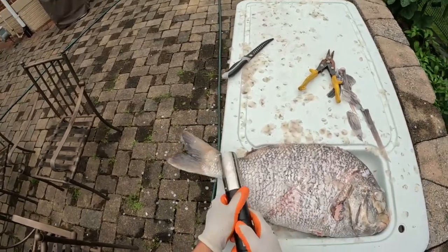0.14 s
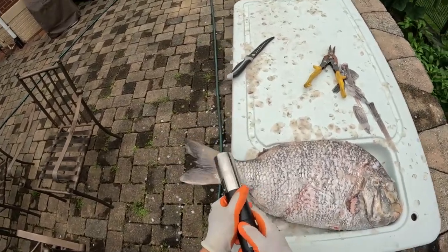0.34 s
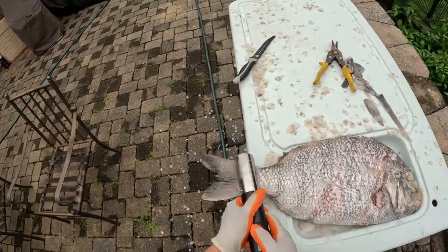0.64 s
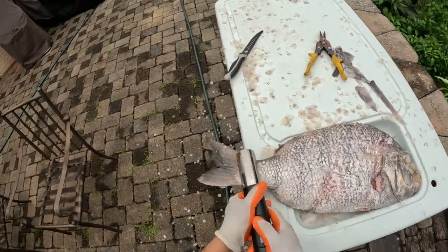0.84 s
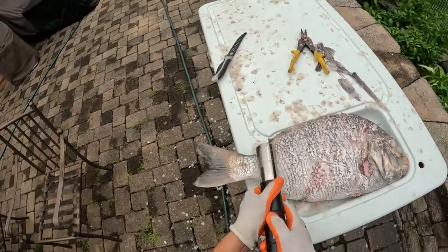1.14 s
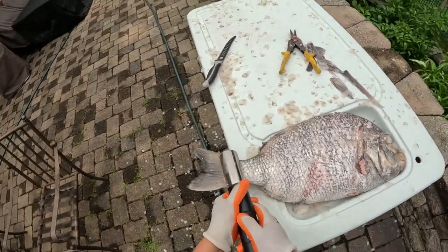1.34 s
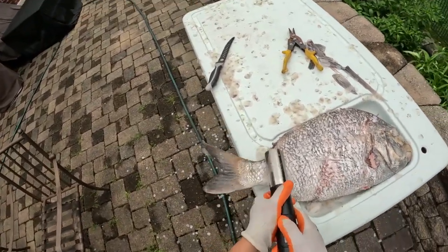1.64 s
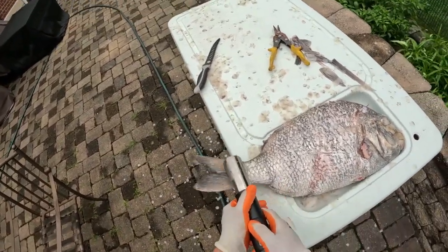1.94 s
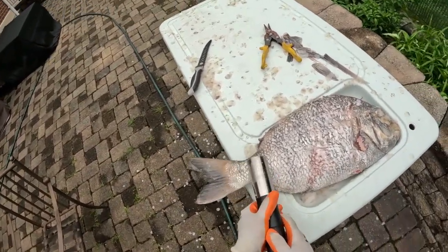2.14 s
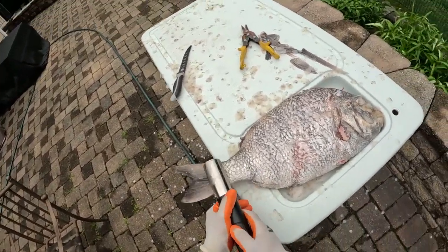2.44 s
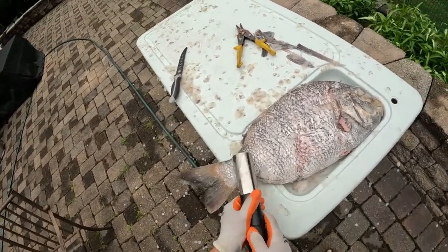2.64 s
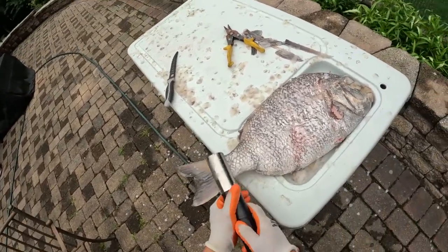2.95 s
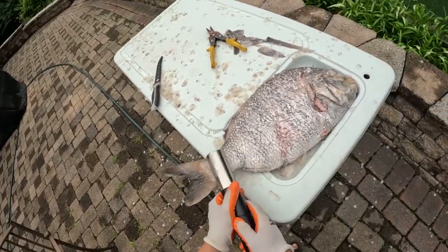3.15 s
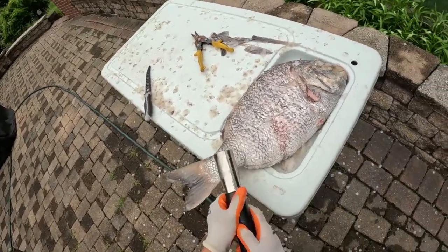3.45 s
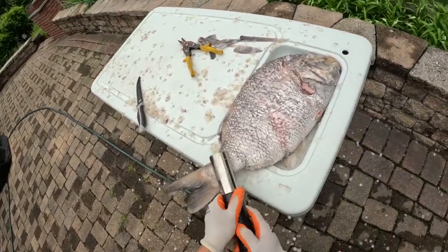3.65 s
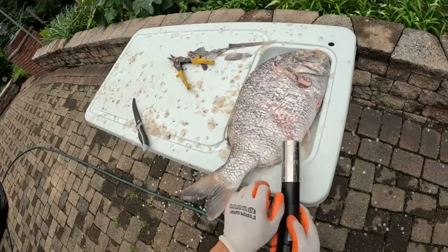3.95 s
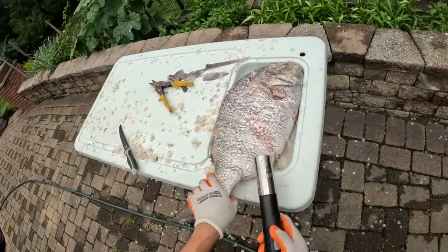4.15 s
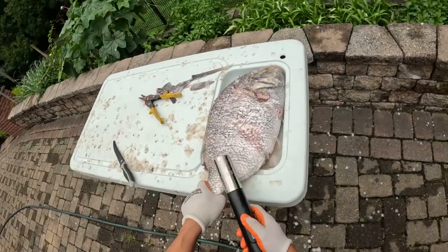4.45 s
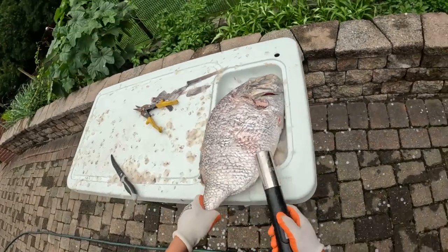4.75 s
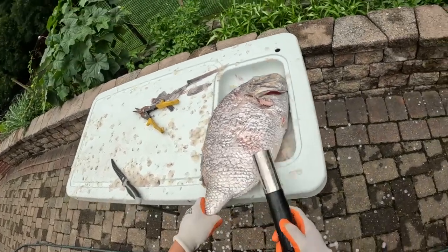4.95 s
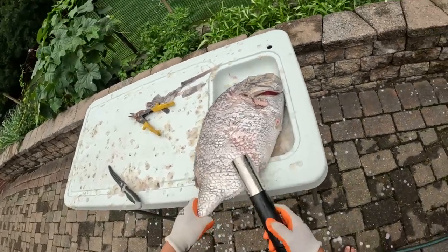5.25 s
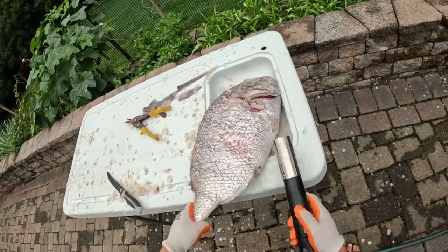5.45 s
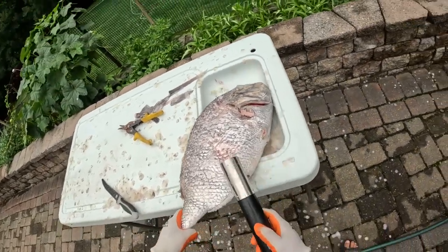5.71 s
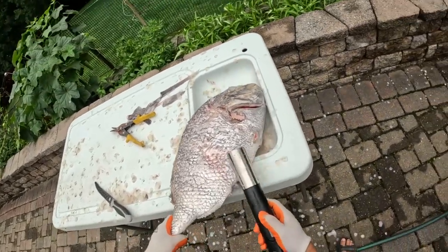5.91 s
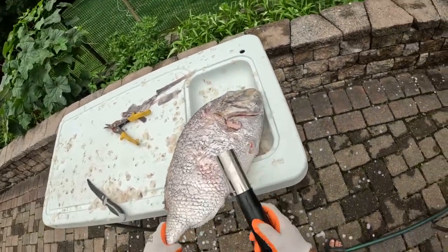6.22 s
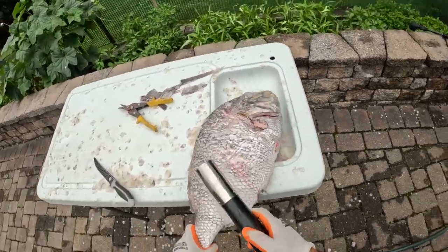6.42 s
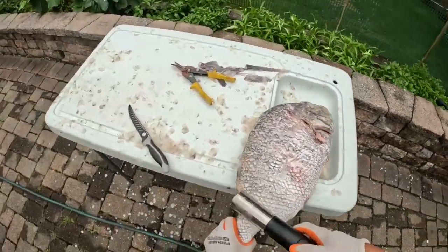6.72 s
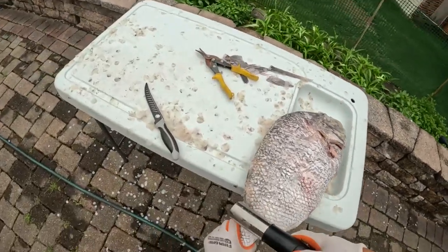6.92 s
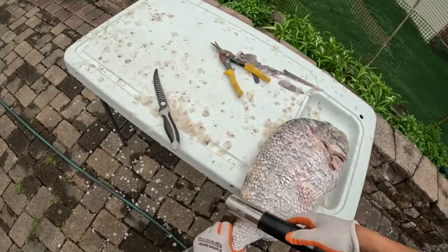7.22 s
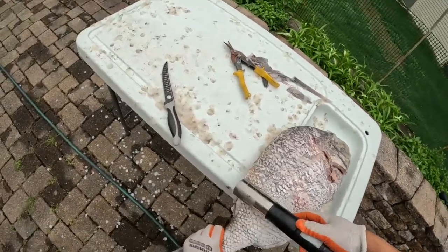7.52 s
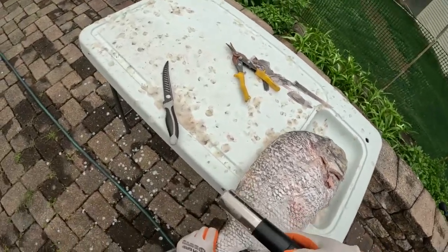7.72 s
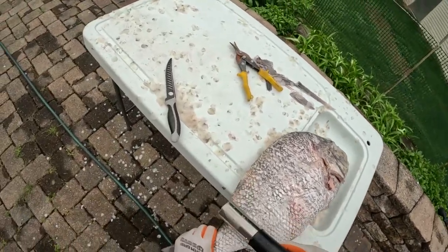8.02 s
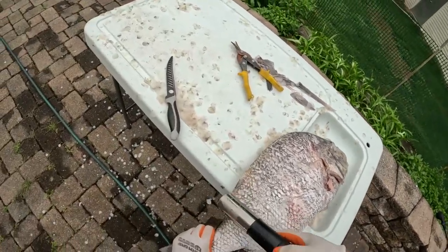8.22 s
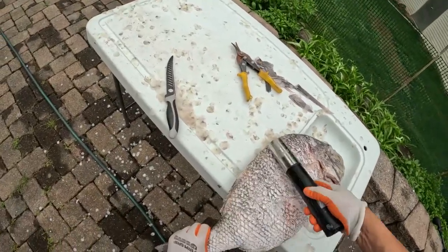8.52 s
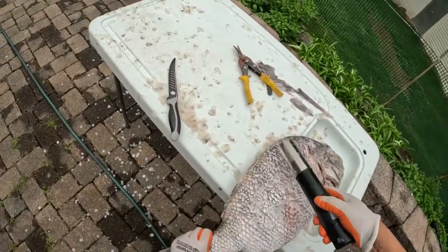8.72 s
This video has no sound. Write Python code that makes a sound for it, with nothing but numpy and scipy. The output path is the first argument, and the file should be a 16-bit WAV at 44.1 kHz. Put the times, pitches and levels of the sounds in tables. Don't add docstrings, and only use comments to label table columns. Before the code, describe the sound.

A handheld scaler whirs and grinds through crackling fish scales outdoors, bumps a plastic table, runs down, blips and starts again.

```python
import sys
import numpy as np
from scipy import signal
from scipy.fft import rfft, irfft, next_fast_len
from scipy.io import wavfile
from scipy.ndimage import uniform_filter1d

SR = 44100
rng = np.random.default_rng(int(sys.argv[2]) if len(sys.argv) > 2 else 0)


def ratio(d):
    e = np.asarray(d, float) / 20
    return 10 ** e


def dump_mix(stems):
    frames = np.atleast_2d(stems).T
    limited = np.clip(frames, -1, 1)
    pcm = np.round(limited * 32767).astype(np.int16)
    wavfile.write(sys.argv[1], SR, pcm)


N = 391166

# on t/s, off t/s
SWITCH_HELD = [
    (-1, 6.35),
    (7.052, 7.44),
    (7.964, 10),
]
COAST_S = (.4, .3, .4)
# t/s, tooth mesh f/Hz
BASE_MESH = [(0, 1922), (.06, 1922), (.2, 1917), (.28, 1907), (.37, 1917), (.44, 1991), (3.7, 1983),
             (4.1, 1953), (4.5, 1960), (5.0, 1931), (5.6, 1925), (6.3, 1907), (7.2, 1854), (8.1, 1923),
             (8.87, 1907)]
# start t/s, length t/s, mesh drag f/Hz, flesh level/dB, steel level/dB
STROKES = [(0.014, 0.33, 44.89, -33.5, -49), (0.531, 0.14, 236.5, -31, -50), (0.781, 0.32, 289.2, -32, -39),
           (1.464, 0.27, 450.2, -32, -37.5), (1.912, 0.3, 299.7, -34.5, -44),
           (2.44, 0.11, 126.3, -40, -36.5), (2.532, .23, 446, -35.5, -35),
           (3.09, 0.13, 99.96, -40.5, -64.5), (3.174, 0.19, 430.4, -34, -48),
           (3.681, 0.24, 422.6, -38.5, -37.5), (4.525, 0.18, 99.85, -41.5, -45),
           (4.681, .24, 251.9, -35.5, -47), (5.26, 0.19, 434.7, -37, -43), (5.922, .17, 372, -35.5, -83),
           (7.189, 0.25, 249.8, -37.5, -41.5), (8.169, 0.26, 139.4, -46.5, -43),
           (8.471, 0.2, 219.8, -34, -52)]
# middle t/s, length t/s, extra mesh drag f/Hz
SPEED_BENDS = [(0.646, .17, 130), (1.16, 0.21, 50), (1.449, 0.13, 35), (1.987, 0.097, -45), (2.189, 0.11, -40),
               (2.273, .1, 20), (2.461, 0.047, 70), (3.731, 0.091, -35), (4.549, 0.058, 86), (5.286, 0.052, 29.5),
               (6.0, 0.074, 60), (6.103, 0.097, -55), (7.152, 0.043, 40), (7.289, 0.11, 70), (7.42, .07, 230)]
# start t/s, length t/s, whine loss level/dB, beating flank gain level/dB
SLACK_SPANS = [
    (.34, .24, -3, 12.5),
    (7.303, 0.18, -4.5, 6.5),
    (8.47, 0.11, 0.5, 0),
]
# t/s, nearness level/dB, second and third overtone level/dB, weight on the table level/dB
TOOL_AIM = [(0, 0, 5.5, 10.5, -3.5), (.42, 5, -4.5, -5.5, 3), (.9, 4, -2.5, 3, 4.5), (1.3, 4, -2, 1, 11),
            (1.9, 4, 0, 3, 0), (2.25, 4.5, 0, -1, -6), (2.8, 1, -1, -4.5, -5.5), (3.2, 2.5, 3.5, 6, -1),
            (3.6, 3, 0.5, 2.5, -4.5), (4.2, 2.5, 3.5, 3.5, 14.5), (4.4, 2.5, -8, 5.5, -1.5),
            (5.1, 1.5, -5.5, 4.5, 6.5), (5.6, 1.5, 0, 5, 14.5), (6.3, 0, 1.5, 5.5, 9),
            (6.5, 10, -17, -2, -5.5), (7.2, 3.5, 1.5, -4, 4), (8.3, 6, 1, 3.5, 4.5),
            (8.87, 3, 1.5, 9, 11.5)]
# t/s, loaded mesh tone level/dB, shell ring level/dB
TOOL_TURN = [(0, -8, -9), (1.3, -14, -4), (2.5, -24, 0), (3.4, -6, -3), (3.8, 8.5, 2), (4.7, 17.5, 4),
             (6.3, 6, -19), (7.2, 6, 11.5), (7.6, -12, 10.5), (8.3, 19.5, -2), (8.87, 5, 5)]
# order/drum turn, level/dB
BEATS = [(2, 1.5), (3, 1.5), (5, 1), (7, 0.1), (12, 1.5)]
# order/drum turn, level against the rattle/dB
SHAFT = [(16, -18), (29, -22.5), (34, -22)]
# f/Hz, level/dB per Hz
HOUSING = [(180, -66.5), (300, -9.5), (348, -20.5), (543, -19.5), (641, -17.5), (794, -21.5), (892, -7),
           (1260, -7.5), (1810, -0.5), (2930, -7.5), (4000, -6), (4650, -11.5), (7880, -13.5),
           (13600, -45.5), (15500, -100)]
# f/Hz, level/dB per Hz
FLESH = [(29, -48.5), (50, 5.5), (81, -41), (119, -4), (183, -15), (252, -6), (532, -7), (1630, -0.5),
         (3500, -16), (4550, -36.5), (7700, -120)]
# f/Hz, level/dB per Hz
STEEL = [(1530, -52), (2600, 12), (3400, 3), (3950, 5), (4730, 11.5), (5410, 6), (7740, 4.5), (8850, -3),
         (10600, 0.5), (11600, -13), (13700, -19.5), (15500, -43.5)]
# f/Hz, level/dB, t60/s
STEEL_MODES = [(5840, -37, 0.0071), (7300, 17.5, 0.0073), (7910, 11.5, 0.01)]
# t/s, peak level/dB, low ring level against the high one/dB
SNAPS = [(0.0387, -16, -25), (0.068, -13, -20), (0.1339, -13, -12), (0.1805, -11, -21), (0.8578, -6.5, -5),
         (0.9855, -14.5, -14), (1.0088, -5, -6.5), (1.039, -8, -23), (1.9729, -13.5, -18),
         (2.0168, -9, -13.5), (2.4314, -16.5, -12), (2.4433, -10.5, -4), (3.2108, -20, 1),
         (3.3222, -16, -20), (3.8064, -14, -31), (3.9188, -9.5, -28), (4.3215, -13.5, -8.5),
         (4.6361, -29, -16), (4.6879, -10, -14), (4.6935, -11.5, -11), (4.7119, -17.5, -7),
         (4.7294, -9.5, -14), (4.7405, -23, -10), (4.7727, -8, -12), (4.8568, -21.5, -21),
         (4.8675, -4, -21), (4.881, -18.5, -14), (5.3158, -11, -16), (5.35, -10, -22), (5.3678, -10, -24),
         (7.229, -18.5, 1), (7.2729, -18, 1.5), (7.29, -24, 1.5), (7.3065, -20, -2.5), (7.3455, -12.5, 0),
         (7.401, -19.5, -0.5), (7.4647, -29, 7)]
# t/s, peak level/dB, low ring level against the high one/dB
FIN_CHATTER = [(2.506, -30, 15), (2.52, -23, 4.5), (2.5358, -15, 0), (2.5405, -8, -5.5), (2.5455, -16, -8),
               (2.555, -27.5, 5), (2.5652, -10.5, -7), (2.568, -15, 0), (2.5738, -10, -5),
               (2.5765, -11, -9), (2.579, -3.5, -16), (2.59, -17.5, 10.5), (2.5975, -23, 11),
               (2.5998, -4, -18), (2.6082, -9, 2.5), (2.616, -26, 10), (2.6255, -21, 3),
               (2.6345, -3.5, -4.5), (2.649, -16, -6), (2.6585, -25.5, -3), (2.668, -18.5, 2),
               (2.679, -8.5, -8), (2.6874, -5, -17), (2.699, -15, -7), (2.7105, -23.5, -9),
               (2.7205, -18, 6.5), (2.7275, -24, 2), (2.7328, -8.5, -10), (2.739, -9, -9),
               (2.748, -12.5, -12)]
# t/s, peak level/dB, pitch f/Hz
CRACKLE = [(0.015, -7.5, 7350), (0.115, -21.5, 7100), (0.2608, -29.5, 7500), (0.3017, -27, 5160),
           (0.3197, -28, 7400), (0.378, -24, 4360), (0.547, -16.5, 8100), (0.5756, -13.5, 7000),
           (0.6005, -26, 7150), (0.6474, -32, 5855), (0.6544, -26, 7500), (0.7855, -25, 5760),
           (0.8275, -10, 7840), (0.909, -10, 7253), (1.432, -13, 7760), (1.4515, -12.5, 7910),
           (1.495, -12.5, 7800), (1.5274, -21, 5393), (1.5664, -14, 5200), (1.5753, -12, 8100),
           (1.5954, -22, 7440), (1.6154, -10, 8044), (1.6294, -17, 6320), (1.6774, -21, 7534),
           (1.728, -20, 6670), (1.925, -12.5, 7560), (2.0505, -27, 7937), (2.0926, -14, 5230),
           (2.1201, -9, 5160), (2.167, -20, 7910), (3.2201, -9, 7270), (3.242, -10, 5070),
           (3.3017, -16, 4916), (3.5054, -15, 5878), (3.6944, -14.5, 7403), (3.7165, -22, 7115),
           (3.7394, -6, 4567), (3.7574, -10.5, 5360), (3.7868, -27, 7500), (4.2762, -12, 5844),
           (4.5298, -10.5, 7073), (4.79, -24.5, 7207), (4.8085, -15, 6820), (5.2754, -18.5, 7570),
           (5.4917, -9.5, 5500), (5.9621, -19, 5273), (6.0661, -12.5, 7180), (7.1766, -14, 7194),
           (7.3065, -16.5, 6500), (7.3582, -11, 8340), (7.4004, -16.5, 5850), (7.4794, -11.5, 7000),
           (8.1386, -20, 5743), (8.2878, -17, 8740), (8.3224, -24, 5295), (8.3449, -13, 8100),
           (8.4677, -13.5, 5537), (8.4924, -6, 7488), (8.5094, -10, 7740), (8.528, -25, 7312)]
# t/s, peak level/dB, hardness level/dB
KNOCKS = [(2.432, -24, 24), (2.538, -20, -5), (2.578, -17, 4), (2.608, -13, -4), (4.921, -17.5, -10.5),
          (5.5001, -3.5, -2.5), (5.5104, -5, -8), (5.522, -11, -13), (6.0892, -3, -3.5), (6.099, -9.5, 0),
          (6.106, -11, -9.5), (6.116, -7.5, -11), (6.1438, -11, -20), (6.471, -34.5, -15), (7.03, -48, -11),
          (7.399, -26, -15), (7.467, -27.5, -2.5)]
# f/Hz, level/dB, t60/s
TABLE_MODES = [(61.4, 4, 0.14), (115.34, 3, 0.12), (185, 3, 0.069), (232.6, -5.5, 0.25), (274.24, 0, 0.13),
               (310, 5, 0.044), (350, -6.5, 0.31), (502, -12.5, 0.094), (680, 5, 0.059), (980, -23, 0.032),
               (957, 4.5, 0.056), (1060, -8.5, 0.041), (1630, 4.5, 0.11)]
# t/s, peak level/dB, pitch f/Hz
TICKS = [(6.6634, -45, 5191), (6.766, -52, 1710), (6.8922, -48, 3680), (6.9199, -53, 4470),
         (6.9529, -53, 5000), (7.0266, -41.5, 1204), (7.056, -22, 1996), (7.4, -9.5, 2050),
         (7.406, -6, 1391), (7.428, -14.5, 397.8), (7.4655, -11, 1896), (7.4795, -27, 8440),
         (7.484, -22, 500.3), (7.492, -12, 1800), (7.5403, -15, 6996), (7.5874, -36, 2100),
         (7.646, -38, 3606), (7.6664, -42, 1930), (7.6764, -44, 2110), (7.7075, -35, 2480),
         (7.7089, -40, 1600), (7.7174, -50, 2240), (7.727, -32, 1296), (7.728, -38, 2301),
         (7.7848, -60, 4530), (7.8127, -42, 2300), (7.8135, -56, 3220), (7.8207, -50, 2600),
         (7.8296, -44, 2310), (7.8915, -59, 7140), (7.9681, -22, 1800)]
# t/s, peak level/dB, low ring level against the high one/dB
PATTER = [(6.575, -38, -15), (6.62, -41, -8), (6.665, -42, -12), (6.734, -49, -15), (6.766, -46, -15),
          (6.823, -55, -20), (6.862, -59, -20), (6.92, -49, -20), (6.953, -46, -20), (7.01, -59, -10),
          (7.5403, -34, -23)]
# f/Hz, level/dB per Hz
YARD = [(12, -33), (20, -4.5), (49, -9.5), (70, -8), (147, -13.5), (169, -13.5), (235, -21), (357, -33),
        (720, -49.5), (1200, -31), (1900, -40.5), (2850, -51), (6530, -50.5), (15000, -65)]
# t/s, level/dB
BREEZE = [(0, -2.5), (6.6, 4), (6.8, 0.5), (7.0, 3), (7.6, 2.5), (7.85, -3.5), (8.87, 0)]
# f/Hz, left-right level/dB
PORT_LEAN = [(60, -0.5), (380, -0.5), (2380, -1.0), (15000, 0)]
# f/Hz, phase/rad
PORT_LEAD = [(0, 0.58), (1380, -0.3), (2150, -0.58), (3190, -0.97), (5680, -0.19), (8180, -0.47),
             (11900, -0.07), (15300, 0.0)]
# f/Hz, level against the direct/dB
SCATTER = [(60, -21), (400, -43), (1200, -15), (3000, -13), (6000, -10), (9000, -15.5), (14000, -4)]

TEETH, RIBS = 90, 6
REST_HZ = 199.5
SING = 1.7


def motor():
    mesh_hz, drag, slow_db, driven = spin()
    near_db, tilt_db, upper_db, _ = columns(TOOL_AIM)
    loss_db, flank_db = slack()
    load = pressure()
    rattle_db = -26 + near_db - 2.1 * drag + slow_db
    second_db = -37.5 + near_db + tilt_db - 6.5 * drag + SING * slow_db + loss_db
    third_db = -48.5 + near_db + upper_db + 2 * drag + SING * slow_db + loss_db
    turns = np.cumsum(mesh_hz / TEETH) / SR
    sag = np.clip((1960 - mesh_hz) / 300, 0, 2)

    beats_db = 1.1 * np.minimum(sag, 1) * np.cos(2 * np.pi * RIBS * turns)
    for order, db in BEATS:
        slip = 0.35 * drift(size=3000)
        beats_db += db * np.cos(2 * np.pi * (order * turns + rng.random()) + slip)
    flaws = rng.standard_normal(2048)
    repeats = evened(flaws[(turns % 1 * 2048).astype(int)])
    repeating = 0.85 - 0.4 * load
    drive = np.sqrt(repeating) * repeats + np.sqrt(1 - repeating) * rng.standard_normal(N)
    rattle = coloured(drive * ratio(1.05 * beats_db + 1.2 * drift(size=120)), HOUSING, 1400, 2600)
    jolts = drive * ratio(1.55 * beats_db + 2.0 * drift(size=110) + 1.5 * drift(size=1500))

    mesh_db, shell_db = columns(TOOL_TURN)
    shell_hz = 1920 + 75 * drift(size=900)
    loose_ring = 0.98
    shell = evened(resonate(resonate(jolts, shell_hz, 400), shell_hz, 400))
    shell *= ratio(shell_db - 11.0) * (loose_ring + (1 - loose_ring) * driven)

    seated = driven * np.clip((mesh_hz - 1400) / 150, 0, 1)
    fuzz = evened(resonate(resonate(jolts, mesh_hz, 160), mesh_hz, 210))
    fuzz *= ratio(-4.0 + 1.8 * slow_db + (3.0 + mesh_db) * sag) * seated

    flank_hz = mesh_hz * (2 + 16 / TEETH)
    flank = ratio(flank_db - 14.5) * evened(resonate(resonate(drive, flank_hz, 220), flank_hz, 220))

    nick = np.diff(np.floor(turns), prepend=0)
    nick_ring = ring([(3260, 6.0, 0.004), (2630, -12.0, 0.015)], size=900)
    tick = ratio(-23.5) * evened(signal.oaconvolve(nick, nick_ring)[:N])

    slaps = np.floor(5 * turns + 0.09 * drift(size=500))
    slap_db = np.array([5.5, -4.0, 2.5, 1.5, -4.0])[slaps.astype(int) % 5]
    sizes = ratio(slap_db + 2.94 * rng.standard_normal(N))
    struck = sizes * rng.choice([-1., 1.], N) * (np.diff(slaps, prepend=0) > 0)
    lash = ratio(0.29 * shell_db) * evened(resonate(resonate(struck, shell_hz, 370), shell_hz + 60, 375))

    shaft = sum(ratio(db) * np.sqrt(2) * np.sin(2 * np.pi * order * turns) for order, db in SHAFT)
    out = ratio(rattle_db - 10.0) * (rattle + shell + fuzz + driven * (shaft + flank + tick + lash))

    overtones = [
        (2, second_db, 0.45, 1.15),
        (3, third_db + 0.6 * beats_db, 1.15, 0.6),
        (4, third_db - 5.0 + 0.6 * beats_db, 1.4, 0.5)]
    for order, db, smear, strain in overtones:
        phase = 2 * np.pi * order * TEETH * turns + (smear + strain * load) * drift(size=110)
        unsteady_db = 2.9 * drift(size=250) + 1.6 * (order - 1) * drift(size=1800)
        out += driven * ratio(db + unsteady_db) * np.sqrt(2) * np.sin(phase)
    return out, turns


def spin():
    t = np.arange(N) / SR
    base_hz, = columns(BASE_MESH)
    keep = np.exp(-1 / (0.045 * SR))
    drag_hz = signal.lfilter([1 - keep], [1, -keep], contact()[0])
    for s, length, hz in SPEED_BENDS:
        drag_hz = drag_hz + hz * np.cos(np.pi * np.clip((t - s) / length, -0.5, 0.5)) ** 2

    start_s, hush_s = 0.03, 0.15
    friction_hz = 600.7
    bare_hz, driven = np.full(N, REST_HZ), np.zeros(N)
    for (on, off), coast in zip(SWITCH_HELD, COAST_S):
        rise = 1 - np.exp(-np.clip(t - on, 0, 1) / start_s)
        fall = np.exp(-np.maximum(t - off, 0) / coast)
        bare_hz = np.maximum(bare_hz, (base_hz * rise + friction_hz) * fall - friction_hz)
        driven = np.maximum(driven, (t > on) * np.clip(1 - (t - off) / hush_s, 0, 1))
    held = sum((t > on) & (t <= off) for on, off in SWITCH_HELD)
    slow_db = 58 * np.log10(bare_hz / base_hz) * (1 - 0.32 * held)
    return np.maximum(bare_hz - drag_hz, REST_HZ), drag_hz / 300, slow_db, driven


def slack():
    t, out = np.arange(N) / SR, np.zeros((2, N))
    for s, length, loss_db, gain_db in SLACK_SPANS:
        span = np.clip(np.minimum(t - s, s + length - t) / 0.057, 0, 1)
        out += np.array([[loss_db], [gain_db]]) * span
    return out


def rasp(turns):
    idle = ratio(np.array([[-48], [-41], [-73]]))
    tremble = ratio(0.5 * np.array([drift(size=1500), drift(size=1100), drift(size=2000)]))
    slowing_db = np.array([[0.38], [1.0], [0.3]]) * spin()[2]
    flesh_db, steel_db, throb_db = 20 * np.log10(idle + contact()[1:4] * tremble) + slowing_db
    throb_db = throb_db + columns(TOOL_AIM)[3]

    rib = RIBS * turns + 0.11 * drift(size=500)
    burst = 0.6 + np.exp(-(rib % 1) / 0.35) * ratio(2.0 * drift(size=300))
    skin = burst * (grit(1500, 0.84) + 0.8 * rng.standard_normal(N))
    flesh = coloured(skin, FLESH, 336, 840)

    load = pressure()
    flying = (0.3 + 0.6 * load) * grit(2500, 3.2) + rng.standard_normal(N)
    scales = burst * fits(np.ones(N)) ** load * flying
    steel = coloured(scales, STEEL, 7520, 8220)
    for mode in STEEL_MODES:
        part = evened(signal.oaconvolve(fits(scales), ring([mode], size=900))[:N])
        steel += (0.054 + 0.5 * load) * ratio(mode[1]) * part
    turns_per_s = np.gradient(turns) * SR
    steel *= np.clip((turns_per_s - 5.5) / 7, 0.05, 1)

    throb = np.sqrt(2) * (np.sin(2 * np.pi * rib) + 0.37 * np.sin(4 * np.pi * rib))
    return ratio(flesh_db - 5.5) * flesh + ratio(steel_db - 13.5) * steel + ratio(throb_db + 1.0) * throb


def contact():
    bite_s, lift_s = 0.027, 0.05
    heavy_hz = 794.5
    dig = 0.92
    out = np.zeros((5, N))
    for s, length, drag_hz, flesh_db, steel_db in STROKES:
        t = np.arange(0, length + lift_s / 2, 1 / SR)
        along = t / t[-1]
        touch = np.clip(np.minimum(t / bite_s, (t[-1] - t) / lift_s), 0, 1)
        flesh, steel, throb = ratio(np.array([flesh_db, steel_db, -46 - drag_hz / 300]))
        drag = drag_hz * (1 - drag_hz / heavy_hz * (1 - along)) * (t < length - lift_s / 2)
        swell = np.sin(np.pi * along)
        rasping = flesh * touch * (dig + (1 - dig) * along)
        out[:, round(s * SR):][:, :len(t)] += [drag, rasping, steel * swell, throb * touch, swell]
    return out


def pressure():
    _, flesh, _, _, swell = contact()
    firmness = np.clip((20 * np.log10(flesh + 1e-6) + 47) / 11, 0, 1)
    return firmness * np.minimum(1.25 * swell, 1)


def fits(x):
    return x * ratio(3.5 * np.minimum(drift(size=700), 1.3))


def snaps(rows):
    size = 900
    out, t = np.zeros(N + size), np.arange(size) / SR
    chance = rng.standard_normal((len(rows), size))
    high = signal.butter(3, [3800, 8400], "bandpass", fs=SR)
    swell = 1 - np.exp(-(t / 0.0006) ** 2)
    soft_edge = 1 - np.exp(-(t / 0.0014) ** 2)
    modes = [(1960, 3, 0.016), (1600, -5, 0.01), (2500, -7, 0.01)]
    for (s, peak_db, low_db), z in zip(rows, chance):
        release = 2.5 * np.sign(z[0]) * (np.arange(size) == 36)
        crack = signal.lfilter(*high, z * swell * ratio(-60 * t / 0.009) + release)
        low = soft_edge * ring(modes, size=size, detune=1 + 0.045 * z[1])
        snap = crack / abs(crack).max() + ratio(low_db) * low / abs(low).max()
        out[round(s * SR):][:size] += ratio(peak_db) * snap
    return out[:N]


def crackle(rows):
    size = 700
    out, t = np.zeros(N + size), np.arange(size) / SR
    chance = rng.standard_normal((len(rows), size))
    for (s, peak_db, hz), z in zip(rows, chance):
        puff = z * np.minimum(t / 0.00074, 1) * ratio(-60 * t / 0.03)
        grain = resonate(resonate(puff, hz, 150 + 0.09 * hz), hz, 300 + 0.66 * hz)
        out[round(s * SR):][:size] += ratio(peak_db - 7.5) * grain / abs(grain).max()
    return out[:N]


def knocks():
    size = 9000
    out, t = np.zeros(N), np.arange(size) / SR
    chance = rng.standard_normal((len(KNOCKS), size))
    dull = signal.butter(2, 600, fs=SR)
    sweep_hz = 330 + 1700 * np.exp(-t / 0.00125)
    slap = np.sin(2 * np.pi * np.cumsum(sweep_hz) / SR)
    for (s, peak_db, hard_db), z in zip(KNOCKS, chance):
        boom = np.zeros(size)
        for turn, mode in zip(z, TABLE_MODES):
            sign = np.sign(turn) if mode[0] < 400 else 1
            boom += sign * ratio(hard_db * (mode[0] > 400)) * ring([mode], size=size)
        loose_gear = evened(signal.lfilter(*dull, z))
        boom += ratio(-3.5 - 60 * t / 0.28) * np.minimum(t / 0.00077, 1) * loose_gear
        boom *= np.minimum(t / 0.002, 1)
        boom -= ratio(13.0 + hard_db - 60 * t / 0.03) * np.minimum(t / 0.00035, 1) * slap
        out[round(s * SR):][:size] += ratio(peak_db) * boom / abs(boom).max()
    return out


def yard():
    level_db = -47.5 + columns(BREEZE)[0] + 2.5 * drift(size=2500)
    return ratio(level_db) * coloured(rng.standard_normal(N), YARD)


def ports(x):
    t, size = np.arange(500) / SR, next_fast_len(N)
    paths = rng.standard_normal((3, 500)) * ratio(-60 * t / 0.0036)
    scattered = sum(drift(size=900) * signal.oaconvolve(x, path)[:N] for path in paths)
    scattered = scattered * np.std(x) / np.std(scattered)
    hz = np.fft.rfftfreq(size, 1 / SR)
    direct = rfft(x, size)
    side = rfft(scattered, size) * ratio(read(SCATTER, hz))
    lean = ratio(read(PORT_LEAN, hz) / 2) * np.exp(0.5j * read(PORT_LEAD, hz))
    return irfft(np.array([(direct + side) * lean, (direct - side) / lean]), size)[:, :N]


def evened(x):
    return x / np.sqrt(np.mean(x ** 2) + 1e-20)


def read(points, hz):
    f, value = np.transpose(points)
    return np.interp(np.log(hz + 1), np.log(f + 1), value)


def columns(rows):
    s, *rest = np.transpose(rows)
    return [np.interp(np.arange(N) / SR, s, c) for c in rest]


def coloured(x, points, lo_hz=0, hi_hz=30000):
    hz = abs(np.fft.fftfreq(4096, 1 / SR))
    gain = ratio(np.maximum(read(points, hz), -100))
    phase = -signal.hilbert(np.log(gain)).imag
    taps = np.fft.ifft(gain * np.exp(1j * phase)).real[:2048]
    inside = (hz > lo_hz) & (hz < hi_hz)
    share = np.sum(gain[inside] ** 2) / np.sum(gain ** 2)
    return evened(signal.oaconvolve(x, taps)[:N]) / np.sqrt(share)


def resonate(x, hz, width):
    turn = np.exp(2j * np.pi * np.cumsum(hz * np.ones(len(x))) / SR)
    r = np.exp(-np.pi * width / SR)
    return 2 * (turn * signal.lfilter([1 - r], [1, -r], x / turn)).real


def ring(modes, size, detune=1):
    t = np.arange(size) / SR
    return sum(ratio(db - 60 * t / t60) * np.sin(2 * np.pi * hz * detune * t) for hz, db, t60 in modes)


def drift(size):
    return evened(uniform_filter1d(uniform_filter1d(rng.standard_normal(N), size), size))


def grit(per_s, spread_db):
    size = ratio(spread_db * np.minimum(rng.exponential(1, N), 3.5)) * rng.choice([-1., 1.], N)
    return evened(size * (rng.random(N) < per_s / SR))


def scene():
    whine, turns = motor()
    torn = snaps(SNAPS) + snaps(FIN_CHATTER) + crackle(CRACKLE)
    loose = snaps(PATTER) + crackle(TICKS)
    return ports(whine + rasp(turns) + torn + loose + knocks() + yard())


def band_limit(x):
    return signal.sosfilt(signal.butter(12, 15770, fs=SR, output="sos"), x)


def record(dry):
    sensed = signal.lfilter(*signal.butter(2, 900, "high", fs=SR), dry.mean(0))
    power = signal.lfilter(np.ones(44) / 44, 1, sensed ** 2)
    power_db = 10 * np.log10(abs(power) + 1e-12)
    fall = np.arange(N) * 101.0 / SR
    held_db = np.maximum.accumulate(power_db + fall) - fall
    over_db = np.maximum(held_db + 20.0, 0)
    ducked = dry / ratio(0.8 * signal.lfilter([0.02], [1, -0.98], over_db))
    narrow = signal.oaconvolve(ducked, signal.firwin(255, 14700, fs=SR)[None], "same")
    return band_limit(narrow)


dry = scene()
out = record(dry)
dump_mix(out)
```